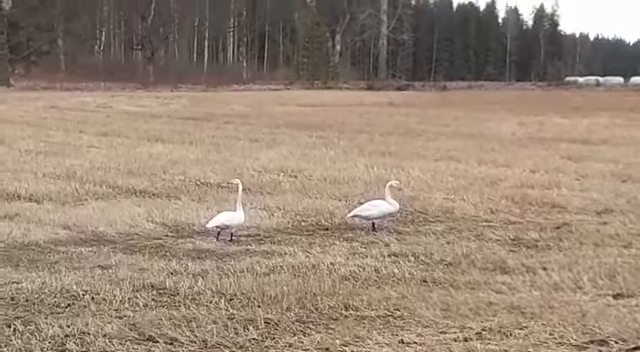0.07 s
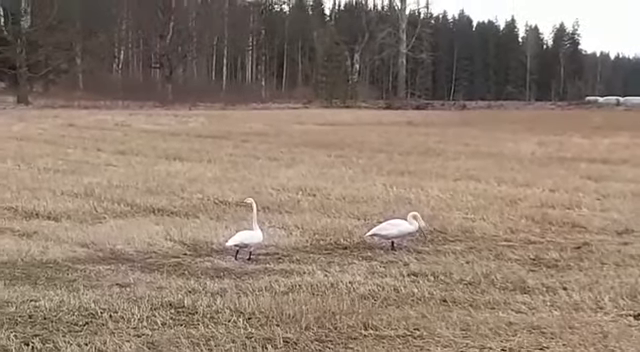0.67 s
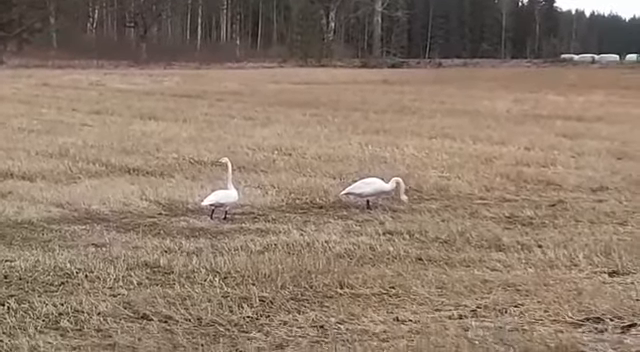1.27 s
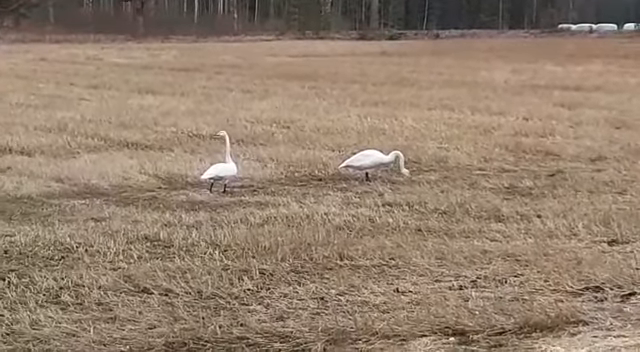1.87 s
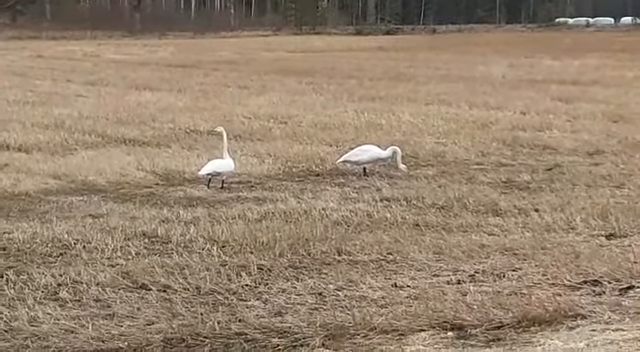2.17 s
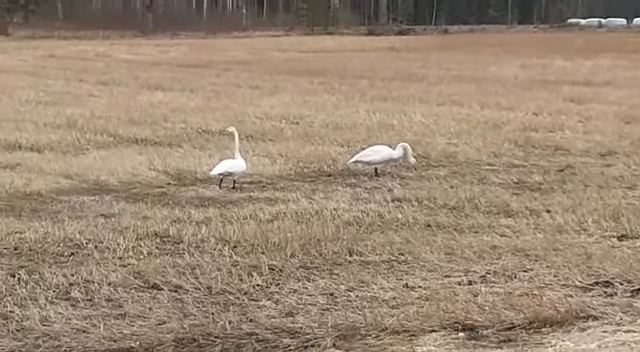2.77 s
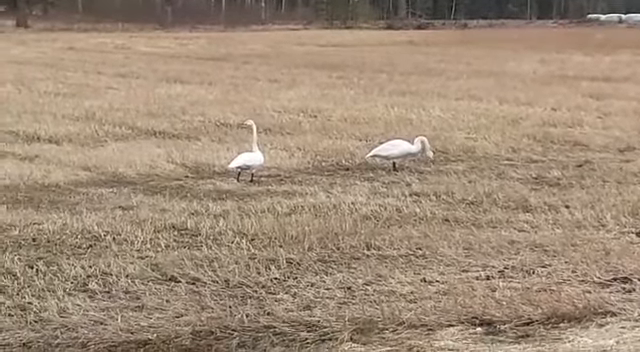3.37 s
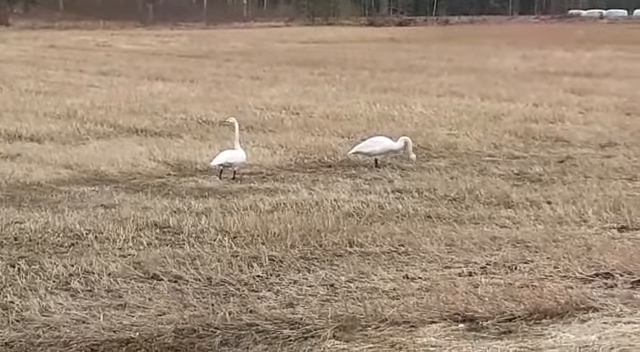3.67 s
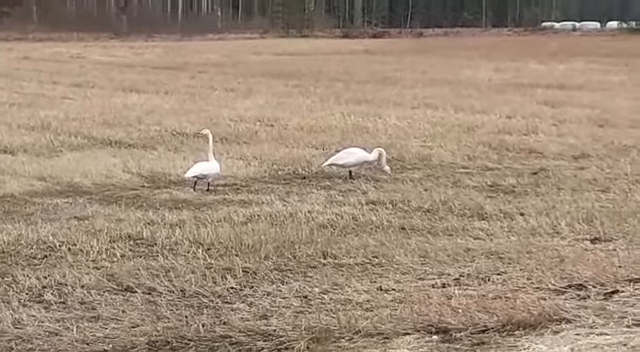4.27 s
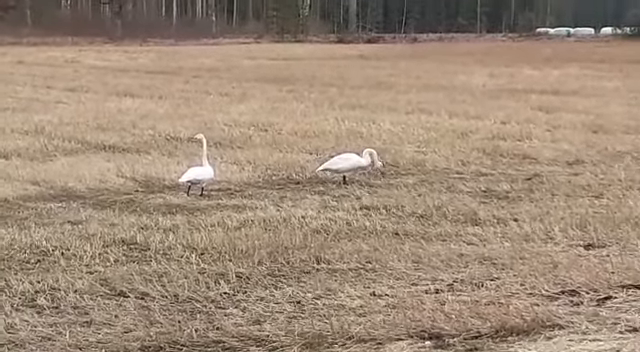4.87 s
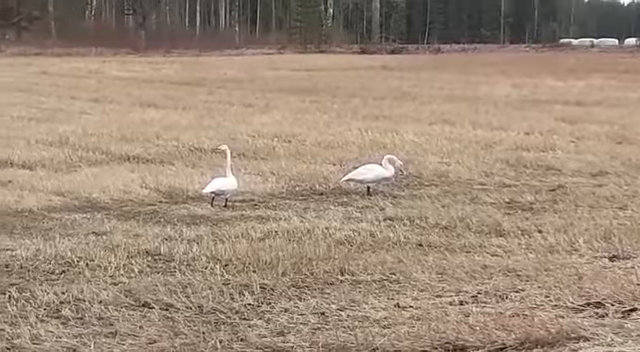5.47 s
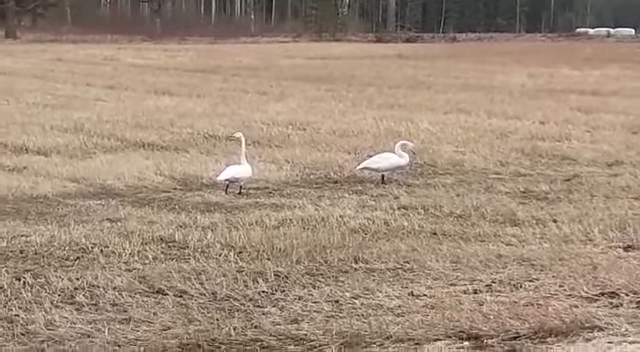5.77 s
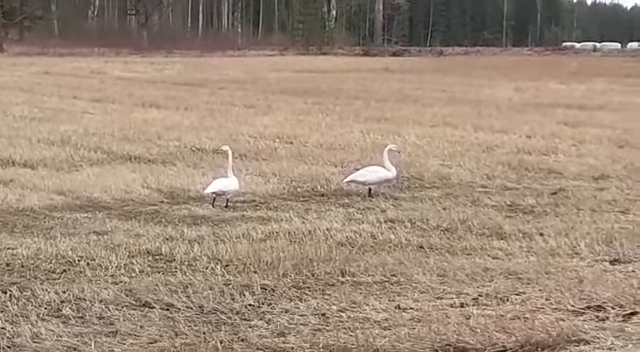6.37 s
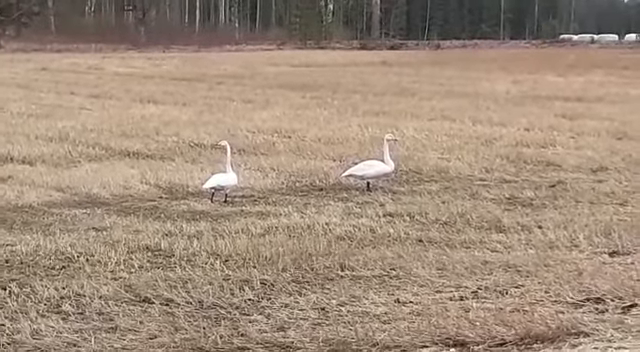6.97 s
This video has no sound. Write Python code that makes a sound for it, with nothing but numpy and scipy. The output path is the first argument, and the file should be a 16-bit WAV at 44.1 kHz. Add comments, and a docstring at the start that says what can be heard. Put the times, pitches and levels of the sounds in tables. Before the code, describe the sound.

Gusty wind rumbles and bumps on the microphone as swans honk briefly, with a soft echo and faint distant birdsong.

```python
"""Swans in a windy stubble field

Two swans give single honks, arched tones from the syrinx; one breaks upward into a shrill register.
The forest edge returns a soft echo, and small birds chirp and twitter far off.
Gusts rumble and bump on the two ports of a hand-held microphone, over a thin hiss,
with two tiny ticks and a little dry rustle close by."""
import sys
import numpy as np
from scipy import signal
from scipy.fft import rfft, irfft
from scipy.io import wavfile
from scipy.ndimage import uniform_filter1d, map_coordinates

SR = 44100
rng = np.random.default_rng(int(sys.argv[2]) if len(sys.argv) > 2 else 0)


def log_audio(samples):
    """Write samples as a 16-bit WAV file to the path given in sys.argv[1]."""
    # one column per channel
    frames = np.atleast_2d(samples).T
    # limit to full scale, then quantise
    limited = np.clip(frames, -1, 1)
    pcm = np.round(limited * 32767).astype(np.int16)
    wavfile.write(sys.argv[1], SR, pcm)


N = 313992
T = np.arange(N) / SR
TOP_HZ = 15800


def undb(db):
    """Decibels to gain."""
    return 10 ** (np.asarray(db) / 20)


def unit(x):
    """Scale to rms 1."""
    return x / np.sqrt(np.mean(x ** 2))


def pan(db):
    """Left and right gains, the left louder by db."""
    return undb(np.array([[db], [-db]]) / 2)


def colour(x, curve):
    """EQ a sound with a curve of (freq_hz, gain_db) points."""
    hz, db = np.transpose(curve)
    bins_hz = np.maximum(np.fft.rfftfreq(x.shape[-1], 1 / SR), 1)
    gain = undb(np.interp(np.log(bins_hz), np.log(hz), db))
    return irfft(rfft(x) * gain, x.shape[-1])


def noise(curve):
    """Wide stereo noise shaped by an EQ curve, rms 1."""
    return unit(colour(rng.standard_normal((2, N)), curve))


def wander(rate_hz, n):
    """Smooth random modulation, rms about 1."""
    hold = max(int(SR / rate_hz), 2)
    steps = np.repeat(rng.standard_normal(n // hold + 2), hold)
    return unit(uniform_filter1d(uniform_filter1d(steps, hold), hold))[:n]


def ramp(u):
    """Smooth fade from 0 to 1."""
    return np.sin(np.pi / 2 * np.clip(u, 0, 1)) ** 2


def add(track, start_s, x):
    """Mix a sound into a track."""
    start = int(start_s * SR)
    first, last = max(start, 0), min(start + x.shape[-1], N)
    track[..., first:last] += x[..., first - start:last - start]


# Wind strength at the ports: time_s, level_db
GUSTS = [(0.0, -51), (.36, -51), (.5, -43.5), (0.86, -42), (0.96, -35.5), (1.3, -40), (1.45, -43),
         (2.1, -41), (2.35, -37.5), (2.75, -35.5), (2.95, -41.5), (3.14, -41.5), (3.3, -58.5), (3.42, -48),
         (3.93, -53.5), (4.0, -42), (4.22, -48.5), (4.34, -35.5), (4.68, -37), (4.76, -48), (5.05, -45),
         (5.33, -42), (5.71, -44.5), (5.8, -34), (5.85, -50), (5.98, -48), (6.05, -45), (6.35, -41.5),
         (6.58, -44), (6.65, -53), (6.73, -47), (6.89, -54), (6.96, -43), (7.12, -39.5)]

def gusts():
    """The rise and fall of the wind, in dB about its mean."""
    db = np.interp(T, *np.transpose(GUSTS))
    return db - db.mean()


# Tone of the hiss bed and of the rush: freq_hz, gain_db
HISS_EQ = [(290, -41.5), (500, -2.5), (1240, -10), (1540, -15.5), (3320, -23.5), (4060, -21), (4900, -24.5),
           (8130, -23.5), (9530, -35.5), (10400, -23.5), (11700, -18), (14700, -17.5), (15800, -19)]
RUSH_EQ = [(300, 9), (900, 11), (2000, -25), (3500, -39), (8000, -45)]

def air(hiss_db=-64.5, gust_follow=0.27, rush_db=-58, rush_start_s=6.93, rush_rise_s=0.13):
    """A thin hiss lifts a little with the gusts; a soft rush swells in at the end."""
    gust_db = uniform_filter1d(gusts(), SR // 4)
    rush = noise(RUSH_EQ) * undb(rush_db) * ramp((T - rush_start_s) / rush_rise_s)
    hiss = noise(HISS_EQ) * undb(hiss_db + gust_follow * gust_db)
    return (hiss + rush) * pan(-2)


# Dropouts in the left rumble: start_s, end_s
LEFT_DROPOUTS = [(1.66, 1.8), (2.05, 2.38), (2.6, 3.4), (4.05, 4.52), (4.72, 5.53), (5.52, 6.15),
                 (5.87, 6.0), (6.37, 6.27), (6.77, 7.2)]

def left_dropouts(depth_db=-28, fade_s=0.02):
    """Cuts in the left rumble in dB, deeper where they overlap."""
    return depth_db * sum(ramp((T - start_s) / fade_s) * ramp((end_s - T) / fade_s)
                          for start_s, end_s in LEFT_DROPOUTS)


# Tone of the large and of the small eddies: freq_hz, gain_db
RUMBLE_EQ = [(15, -36), (30, -17), (45, -6), (68, 1.5), (110, -2), (170, -6), (240, -19), (400, -38),
             (800, -62)]
FLUTTER_EQ = [(100, -9.5), (200, -5.5), (280, -0.5), (370, 1), (480, -7), (650, -15.5), (1000, -28.5),
              (1600, -34), (3000, -38.5), (8000, -49), (10000, -64)]

def wind(rumble_db=-41, flutter_db=-52, dropouts_from_s=1.6):
    """Large eddies rumble and small ones flutter on each port; later the left rumble cuts in and out."""
    gust_db = gusts()
    shared_db = 2.5 * wander(45, N)  # the ports share part of each eddy
    eddy_db = shared_db + 1.6 * np.array([wander(45, N), wander(45, N)])
    crackle_db = 3.3 * np.array([wander(150, N), wander(150, N)])
    rumble = unit(noise(RUMBLE_EQ) * undb(eddy_db + crackle_db / 2)) * undb(rumble_db + 0.95 * gust_db)
    flutter = unit(noise(FLUTTER_EQ) * undb(eddy_db + crackle_db)) * undb(flutter_db + 0.99 * gust_db)
    # from here on the left rumble is weaker and cuts in and out, and the right flutter is softer
    later = ramp((T - dropouts_from_s) / 0.072)
    rumble *= undb([-5 * later + left_dropouts(), 0.5 * later])
    flutter[1] *= undb(-3.5 * later)
    return rumble + flutter * pan(3)


# The hardest wind hits: centre_s, peak_db, centre_hz, half_length_s, pan_left_db
BUMPS = [ (0.289, -26.5, 68, 0.039, 0), (0.756, -24.5, 303, 0.0092, -3.5), (.795, -34.5, 263, 0.0072, 10),
         (0.957, -21, 205, 0.036, -2), (1.008, -20, 145, 0.028, -2), (1.027, -27.5, 240, .024, 2),
         (1.199, -28, 226, 0.017, 6), (1.256, -29.5, 131, .03, -6), (1.344, -24, 89.5, .03, 3),
         (1.778, -29, 114, 0.026, -11), (1.956, -27.5, 143, 0.036, -1.5), (2.23, -29, 141, 0.015, -8.5),
         (2.332, -22, 156, 0.018, 9), (2.478, -27, 145, .014, -1), (2.571, -28, 159, .02, -10),
         (3.132, -35, 89, .035, 3), (3.445, -30.5, 114, 0.013, -5), (4.02, -32, 167, 0.025, -8),
         (4.468, -18, 311.5, .024, 2), (4.564, -30, 172, 0.024, -6), (4.604, -27.5, 420, 0.0087, 3),
         (4.622, -26, 218.3, 0.019, -1), (4.702, -36, 107, 0.0286, -12), (5.108, -39.5, 330, 0.0084, -2),
         (5.162, -24.5, 298, 0.012, -4), (5.221, -30, 201, 0.0097, -8), (5.305, -30, 110, 0.015, 0),
         (5.337, -31.5, 210, .018, 5), (5.788, -35, 200, 0.032, -1), (6.285, -30.5, 234, 0.017, 0),
         (6.473, -33, 263, .012, 3), (7.025, -37, 288, .016, 11), ]

def wind_bumps():
    """An eddy that hits the ports squarely pushes through a few uneven pressure swings."""
    out = np.zeros((2, N))
    for centre_s, peak_db, hz, half_length_s, pan_db in BUMPS:
        n = int(2 * half_length_s * SR)
        thump_eq = [(hz / 10, -24), (hz / 3, -8), (hz, 0), (1.3 * hz, -3),
                    (2.2 * hz, -25), (8 * hz, -60), (SR / 2, -90)]
        swings = colour(rng.standard_normal((2, SR // 10)), thump_eq)[:, :n] * np.hanning(n) ** 2
        swings /= np.abs(swings).max(axis=1, keepdims=True)
        add(out, centre_s - half_length_s, undb(peak_db) * pan(pan_db) * swings)
    return out


# Close, dry rustles: start_s, length_s, level_db
RUSTLES = [(0.895, 0.14, -64), (1.74, 0.11, -70)]
# Tone of the rustle: freq_hz, gain_db
RUSTLE_EQ = [(1500, 4.5), (3000, -6), (5000, -6.5), (8400, 1.5), (9600, -15), (14000, -12)]
# Ticks on the right side of the casing: start_s, peak_db
TICKS = [(0.0877, -29.5), (0.604, -46)]

def handling(tick_decay_s=0.0002):
    """A little dry rustle close to the microphone and two tiny ticks on its casing."""
    envelope = sum(undb(db) * ramp((T - start_s) / 0.036) * ramp((start_s + length_s - T) / 0.045)
                   for start_s, length_s, db in RUSTLES)
    out = noise(RUSTLE_EQ) * undb(2 * wander(180, N)) * envelope
    t = T[:SR // 200]
    for start_s, peak_db in TICKS:
        snap = rng.standard_normal(len(t)) * np.exp(-t / tick_decay_s)
        tick = colour(np.roll(snap, 20), [(2500, 3.5), (9000, -8)])
        add(out[1], start_s, undb(peak_db) * tick / np.abs(tick).max())
    return out


# Tone of the scatter from field and trees, and of the forest echo: freq_hz, gain_db
SCATTER_EQ = [(300, -12), (600, -15), (820, -8), (1200, -12), (1800, -6), (2500, -10), (3200, -9),
              (4200, -5), (6500, -5), (10000, -9), (15000, -15)]
ECHO_EQ = [(600, -4.5), (1200, -8), (2500, -11), (4000, -9), (8000, -2)]

def field_reverb(x, stubble_db, trees_db, echo_db, stubble_t60_s=0.24, trees_t60_s=1.2, echo_s=0.228):
    """Quick scatter from the stubble, a long wash from the trees and an echo smeared by the trunks."""
    t = T[:SR]
    stubble = unit(undb(-60 * t / stubble_t60_s) * ramp(t / 0.0062))
    trees = unit(undb(-60 * t / trees_t60_s) * ramp(t / 0.14))
    decay = undb(stubble_db) * stubble + undb(trees_db) * trees
    scatter = colour(rng.standard_normal((2, SR)), SCATTER_EQ) * decay / np.sqrt(SR)
    wet = signal.fftconvolve(x[None], scatter)[:, :N]
    trunks = rng.standard_normal((2, SR)) * stubble / np.sqrt(SR)  # same short decay as the stubble
    smeared = signal.fftconvolve(x[None], trunks)[:, :N]
    add(wet, echo_s, undb(echo_db) * colour(undb(-6) * x + smeared, ECHO_EQ))
    # moving air makes the long paths waver, which blurs the upper partials
    waver_samples = 1.7e-5 * SR
    return np.array([map_coordinates(side, [np.arange(N) + waver_samples * wander(330, N)])
                     for side in wet])


# Twittering phrases: start_s, last_note_db, pitch_ratio
PHRASES = [(0.224, -65.5, 1.04), (4.065, -68, 1.18), (6.341, -75.5, 1.02)]

def twitter(notes=7, first_gap_s=0.051, last_gap_s=0.12):
    """Chirp cues for runs of chups that slow down, swell and step up in pitch."""
    gaps_s = first_gap_s + (last_gap_s - first_gap_s) * np.linspace(0, 1, notes - 1) ** 3
    offsets_s = np.append(0, np.cumsum(gaps_s))
    effort = ramp((np.linspace(0, 1, notes) - 0.42) / 0.42)
    lengths_s = np.interp(effort, [0, 1], [0.043, 0.038])
    bends = np.interp(effort ** 2, [0, 1], [0.79, 0.93])
    swells_db = -8 * (1 - effort)
    return [(start_s + offset_s, length_s, pitch_ratio * bend, last_note_db + swell_db, "chup")
            for start_s, last_note_db, pitch_ratio in PHRASES
            for offset_s, length_s, bend, swell_db in zip(offsets_s, lengths_s, bends, swells_db)]


# Contour of each bird note: position (0-1), pitch_hz, throat_hz, throat_width_hz, level_db
NOTE_SHAPES = { "chup": [(0, 542, 5940, 1590, -9), (.25, 660.5, 5100, 1290, 0), (.42, 714, 4480, 550, -2.5),
               (.68, 731, 4570, 420, -1), (1, 673, 4050, 347, -2)], "whit": [(0, 689, 6100, 1800, -5.5),
               (.45, 1011, 4630, 1300, -4), (.72, 1430, 5600, 800, -2), (.84, 1594, 6300, 400, -0.5),
               (1, 1690, 6300, 300, -8)], "seep": [(0, 5160, 7000, 3000, -12),
               (.12, 8320, 7000, 3000, -9.5), (.7, 7450, 7000, 3000, -8.5), (1, 7220, 7000, 3000, -28)], }
# Single chirps: start_s, length_s, pitch_ratio, level_db, note
CHIRPS = [ (1.892, 0.13, 0.94, -58, "seep"), (2.08, 0.12, 0.91, -58, "seep"),
          (2.251, 0.053, 0.99, -58, "whit"), (2.35, 0.049, 0.96, -54.5, "whit"),
          (2.47, 0.048, 0.94, -58, "whit"), (2.625, 0.046, 1, -65, "chup"),
          (6.558, 0.034, 0.94, -71, "chup"), (6.57, 0.13, 0.92, -69, "seep"), ]

def small_birds(quaver=0.022):
    """Gliding harmonic notes; a moving throat resonance picks out the partial that carries."""
    out = np.zeros(N)
    harmonics = np.arange(1, 17)[:, None]
    for start_s, length_s, pitch_ratio, level_db, note in CHIRPS + twitter():
        u = np.linspace(0, 1, int(length_s * SR))
        positions, *contours = np.transpose(NOTE_SHAPES[note])
        pitch_hz, throat_hz, width_hz, swell_db = (np.interp(u, positions, c) for c in contours)
        pitch_hz = pitch_hz * pitch_ratio * (1 + quaver * wander(500, len(u)))
        partials_hz = harmonics * pitch_hz
        resonance = 1 / (1 + ((partials_hz - throat_hz * pitch_ratio) / width_hz) ** 2)
        gains = resonance * ramp((10000 - partials_hz) / 2000)
        tone = (gains * np.sin(2 * np.pi * harmonics * np.cumsum(pitch_hz) / SR)).sum(0)
        tone /= np.sqrt((gains ** 2).sum(0) / 2 + 1e-12)  # even level as the resonance moves
        add(out, start_s, tone * undb(level_db + swell_db) * ramp(u * 10) * ramp((1 - u) * 20))
    return out


def overtones(phase, pitch_hz, levels_db, pressure, uneven_db, bloom=0.23, rolloff_db=-2):
    """Harmonic stack, rms 1: the upper partials bloom under full pressure and dip unevenly."""
    tone = 0
    for k in range(int(TOP_HZ / pitch_hz)):
        past_last = max(k + 1 - len(levels_db), 0)
        level_db = levels_db[min(k, len(levels_db) - 1)] + rolloff_db * np.sqrt(past_last)
        waver_db = uneven_db * (min(k, 2) / 2) ** 2 * np.minimum(wander(45, len(phase)), 0.5)
        gain = undb(level_db + waver_db) * pressure ** (bloom * min(k, 10))
        tone = tone + gain * np.sin((k + 1) * phase + rng.uniform(0, 2 * np.pi))
    return unit(tone)


# Swan timbres, one entry a partial from the fundamental up: level_db
ROUND = [3.5, -9, -31, -28.5, -32.5, -37, -31.5, -42.5, -53, -39, -48, -43.5]
CRACKED = [3, -19, -12, -27, -20.5, -27, -29, -39, -37, -22, -36, -43]
SHRILL = [6.5, -12, 2, -4.5, -14.5, -12, -10.5, -17, -12, -14, -18, -31, -25, -23, -17, -30, -17, -21]
REEDY = [3.5, -9.5, -28, -30.5, -38, -32.5, -40, -32, -44, -42, -42, -41, -41.5]
SOFT = [7.5, -6.5, -17.5, -23, -30, -30.5, -29.5, -32.5, -38, -37, -44, -35, -41]
BRASSY = [1, -16, -28, -20, -25.5, -22, -20.5, -27, -27, -34, -36, -45]
LOW_REGISTER = [1.5, -9.5, -17.5, -14, -19.5, -19, -25.5]  # where a cracking honk catches first
# Timbre of each voicing, by name
VOICINGS = {"round": ROUND, "cracked": CRACKED, "shrill": SHRILL, "reedy": REEDY, "soft": SOFT, "brassy":
            BRASSY}
# Grit of each voicing: onset_crack (0-1), late_hoarseness (0-1), uneven_partials_db, rasp_db
GRIT = {"round": (0, .06, 2, -15), "cracked": (.7, .08, 2, -19), "shrill": (.5, .04, 2, -19),
        "reedy": (0, .12, 4, -11), "soft": (0, .07, 3, -18), "brassy": (0, .07, 2.5, -16)}

def honk(length_s, pitch_hz, sag, fade_s, voicing, break_s=0.011, break_rise_s=0.014, low_decay_s=0.011):
    """The syrinx arches in pitch and turns hoarse as it tires; a cracking honk jumps up a register."""
    crack, hoarseness, uneven_db, rasp_db = GRIT[voicing]
    n = int(length_s * SR)
    t = T[:n]
    u = t / length_s
    roughness = 0.04 + crack ** 2 / 2 * np.exp(-(t / 0.046) ** 2) + hoarseness * ramp(2 * u - 0.5)
    from_middle = 2 * u - 1
    arch = 1 - sag * (1 + 0.287 * from_middle) * np.abs(from_middle) ** 2.45  # sags deeper at the end
    jitter = 0.03 * roughness * wander(420, n)
    phase = 2 * np.pi * np.cumsum(pitch_hz * (arch + jitter)) / SR
    pressure = np.sin(np.pi * u).clip(0, 1)
    tone = overtones(phase, pitch_hz, VOICINGS[voicing], pressure, uneven_db)
    if crack:
        low = crack * overtones(0.88 * phase, pitch_hz, LOW_REGISTER, pressure=0.93, uneven_db=uneven_db)
        low_fade = np.exp(-np.maximum(t - break_s - break_rise_s / 2, 0) / low_decay_s)
        tone = tone * ramp((t - break_s) / break_rise_s) + low * low_fade
    # uneven cycles shake the level and rasp between the partials
    tone *= 1 + roughness * wander(281.3, n)
    grit = undb(rasp_db) * roughness * rasp(phase)
    attack_s = 0.021 if crack else 0.038
    return (tone + grit) * ramp(t / attack_s) * ramp((length_s - t) / fade_s)


# Tone of the rasp: freq_hz, gain_db
RASP_EQ = [(300, -14), (800, 15), (1400, -10), (2500, -11.5), (4500, -2.5), (6000, -16.5), (14000, -33.5)]

def rasp(phase):
    """Noise that pulses once with each cycle of the syrinx."""
    return unit(colour(rng.standard_normal(len(phase)), RASP_EQ)) * (1 + np.cos(phase))


# Swan calls: start_s, length_s, top_pitch_hz, sag_ratio, level_db, fade_out_s, reverb_send_db, voicing
HONKS = [ (-.05, 0.11, 600, 0.021, -59, .02, 18, "soft"), (.02, 0.052, 795, 0.021, -60, .038, 12, "round"),
         (1.086, .11, 604.3, 0.12, -26.5, 0.058, 6.5, "round"),
         (1.149, .068, 803.5, 0.064, -36.5, 0.046, 7.5, "cracked"),
         (1.404, 0.1, 817.8, 0.026, -39, 0.033, 11.5, "shrill"),
         (2.691, .14, 606.4, .12, -28.5, 0.031, 5.5, "reedy"),
         (4.229, 0.14, 598.7, .11, -29.5, 0.041, 2, "soft"),
         (5.683, .12, 593.2, 0.078, -32, 0.024, 1.5, "brassy"), ]
# An overtone ringing on after a honk: start_s, length_s, pitch_hz, level_db
AFTER_RINGS = [(2.78, 0.1, 4200, -61.5)]

def swans(left_lag_s=0.00002):
    """The honks as they reach the two ports, and as they carry toward the trees."""
    direct, send = np.zeros(N), np.zeros(N)
    for start_s, length_s, pitch_hz, sag, level_db, fade_s, send_db, voicing in HONKS:
        call = undb(level_db) * honk(length_s, pitch_hz, sag, fade_s, voicing)
        add(direct, start_s, call)
        add(send, start_s, call * undb(send_db))
    for start_s, length_s, pitch_hz, level_db in AFTER_RINGS:
        t = T[:int(length_s * SR)]
        ring = np.sin(2 * np.pi * pitch_hz * t + wander(200, len(t)) / 2)
        add(direct, start_s, undb(level_db) * np.sin(np.pi * t / length_s) * ring)
    left = map_coordinates(direct, [np.arange(N) - left_lag_s * SR])
    return np.array([left, direct]), send


def scene():
    """Swans ahead, small birds far off, wind at the microphone."""
    direct, send = swans()
    birds = small_birds()
    honks = direct * pan(0.054) + field_reverb(send, stubble_db=-3, trees_db=-25.5, echo_db=-25.5)
    chirps = birds * pan(-0.81) + field_reverb(birds, stubble_db=4, trees_db=-13, echo_db=-39)
    return honks + chirps + wind() + wind_bumps() + handling() + air()


def record(dry):
    """A steep low-pass trims the top end."""
    return signal.sosfilt(signal.ellip(10, 0.2, 70, TOP_HZ, fs=SR, output="sos"), dry)


dry = scene()
out = record(dry)
log_audio(out)
```